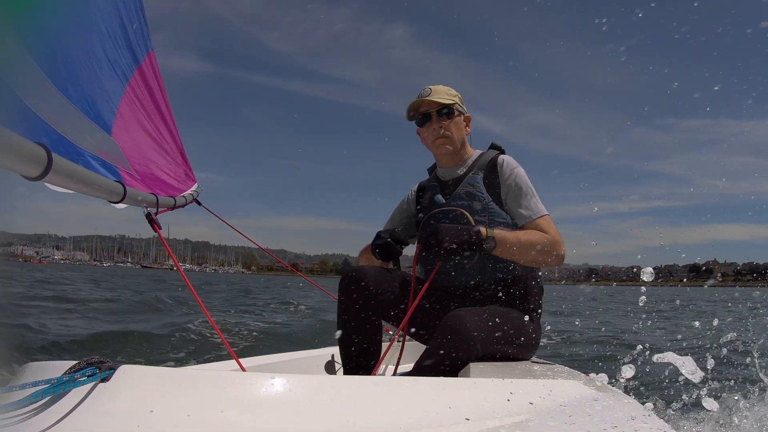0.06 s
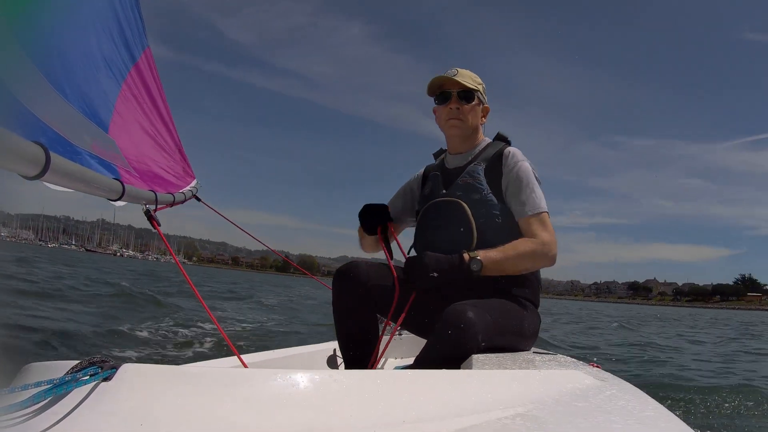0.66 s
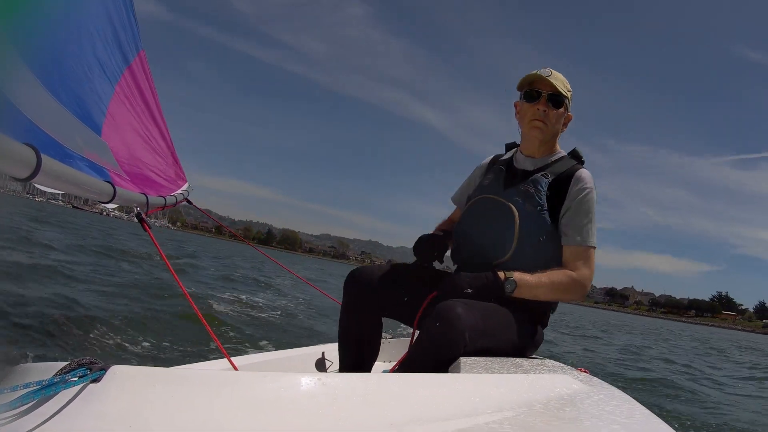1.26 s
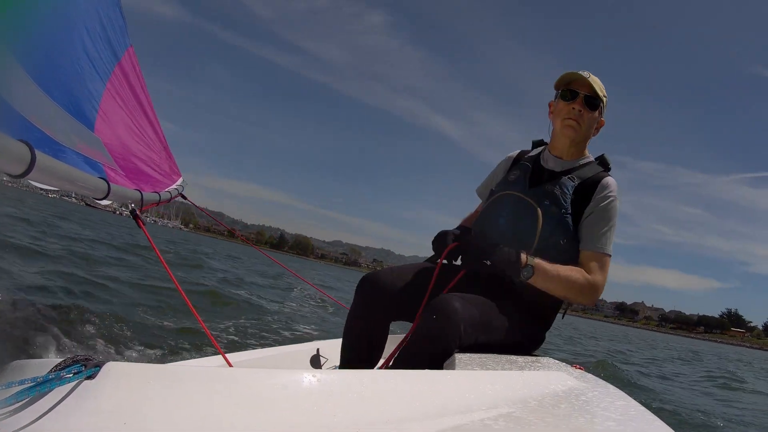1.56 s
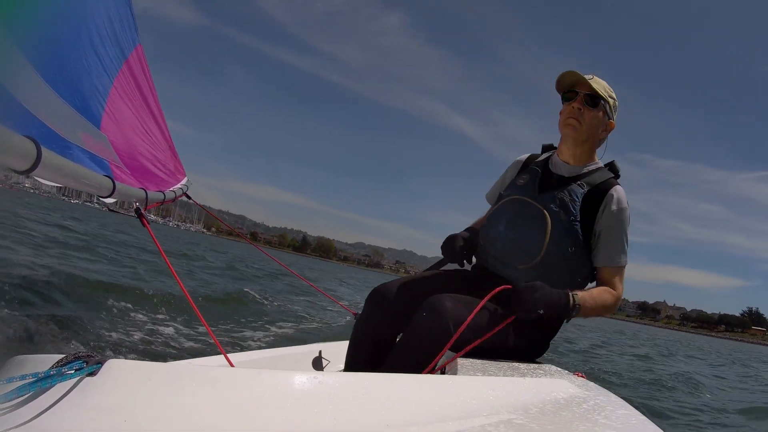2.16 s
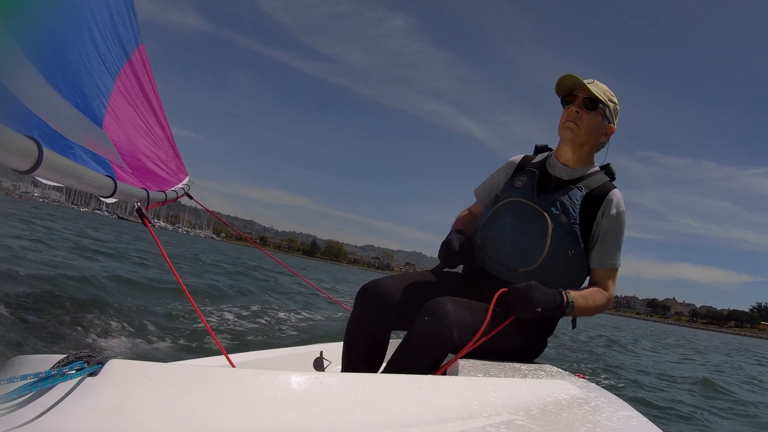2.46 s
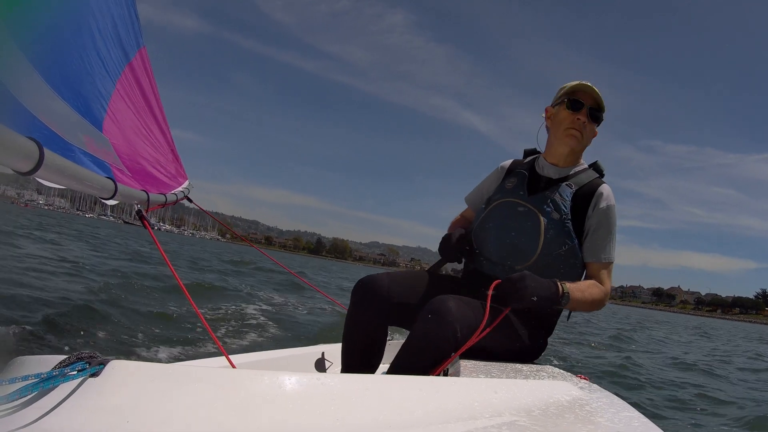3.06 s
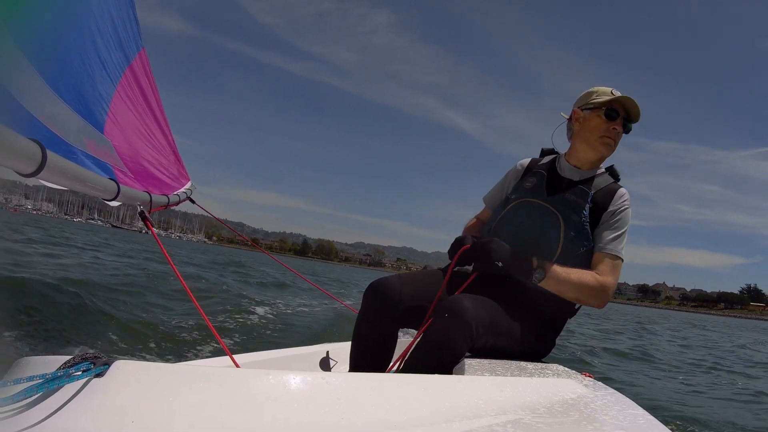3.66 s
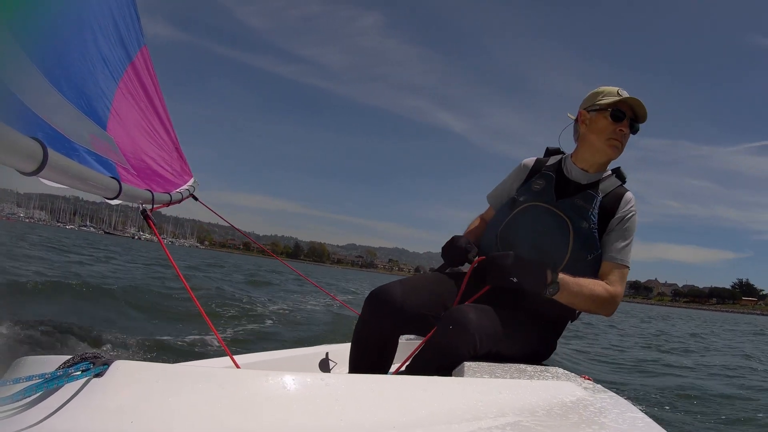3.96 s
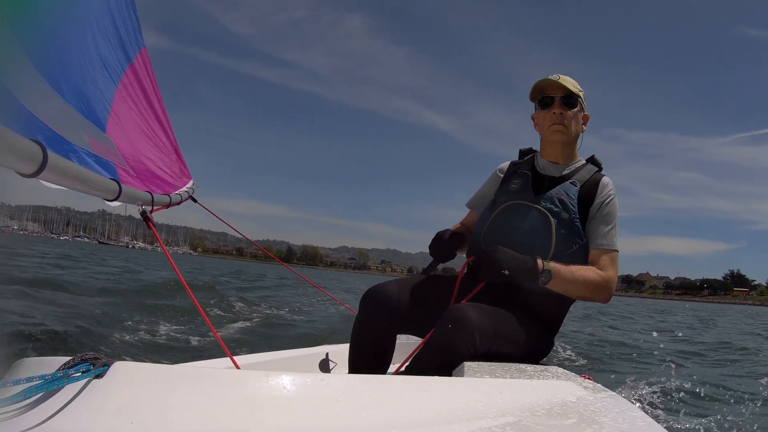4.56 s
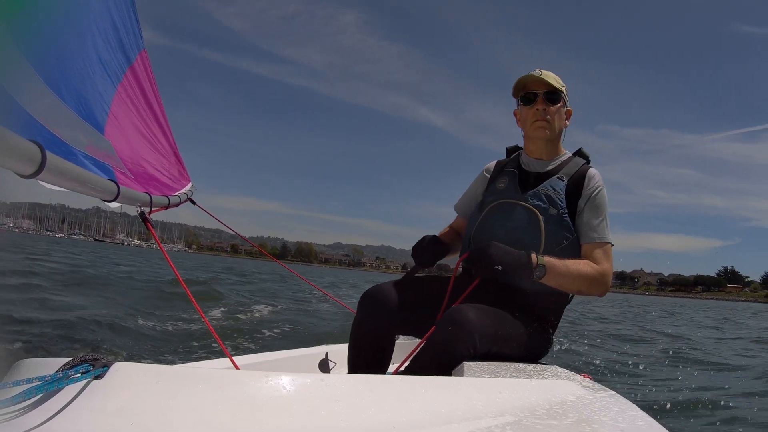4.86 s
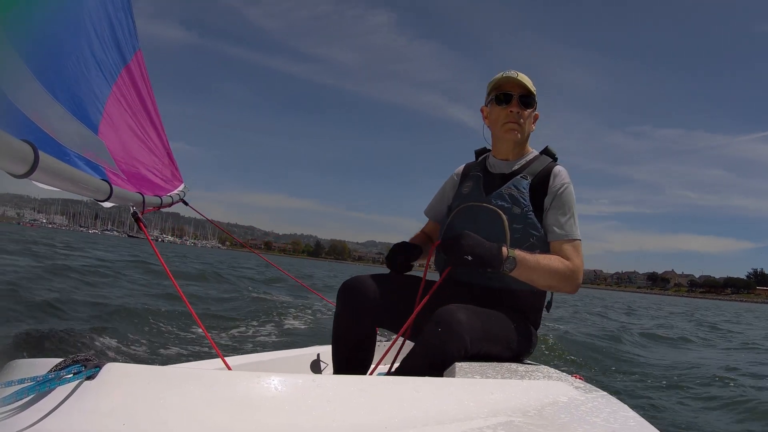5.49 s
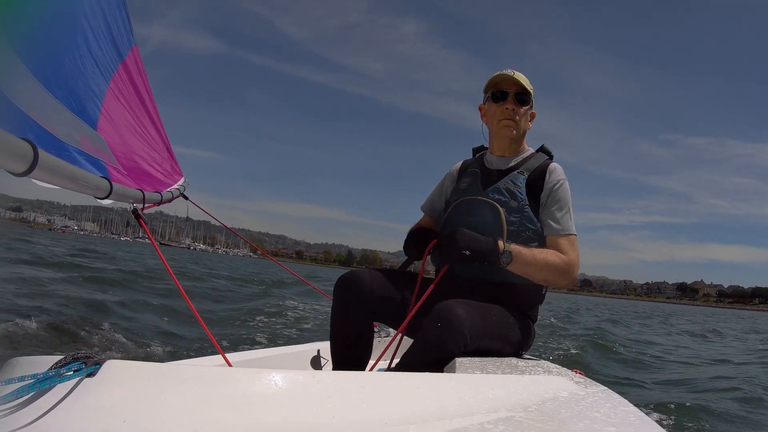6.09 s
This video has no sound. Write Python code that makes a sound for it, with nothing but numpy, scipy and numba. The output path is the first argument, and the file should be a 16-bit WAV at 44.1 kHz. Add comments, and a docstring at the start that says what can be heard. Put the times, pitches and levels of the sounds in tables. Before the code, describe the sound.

Muffled water gurgles and knocks along a sailing dinghy's hull in quick, booming surges, with rumbling wind and light ticks of spray.

```python
"""A sailing dinghy beats through short chop, heard from a camera in a waterproof case on deck.
Spray patters down at the start. Wave after wave then rushes and bubbles along the side and, with the wind,
buffets hull and case into a low boom; water slaps and knocks, drops tick on the case, a rope creaks.
The biggest waves come near 1.5, 3.2 and 6 s; after each, gain control briefly ducks the hiss.
Throughout, the case muffles the treble."""
import sys
import numpy as np
from scipy import signal
from scipy.fft import rfft, irfft
from scipy.io import wavfile
from scipy.ndimage import uniform_filter1d
from numba import njit

SR = 44100
rng = np.random.default_rng(int(sys.argv[2]) if len(sys.argv) > 2 else 0)


def store_pcm(level_fs):
    """Save levels as 16-bit WAV."""
    pcm = np.round(np.clip(level_fs, -1, 1) * 32767).astype(np.int16)
    wavfile.write(sys.argv[1], SR, np.atleast_2d(pcm).T)


N = 279151
TIME = np.arange(N) / SR


def undb(db):
    """Decibels to gain."""
    return 10 ** (np.asarray(db) / 20)


def unit_rms(x):
    """Scale to rms 1."""
    return x / np.sqrt(np.mean(x ** 2))


def unit_peak(x):
    """Scale to peak 1."""
    return x / np.abs(x).max()


def add(out, start_s, x):
    """Mix x into out from start_s."""
    i = int(np.clip(start_s * SR, 0, N - 1))
    out[i:i + len(x)] += x[:N - i]


def later(x, lag_s):
    """The same curve lag_s later."""
    return np.interp(TIME - lag_s, TIME, x)


def colour(x, points, size=4096):
    """Minimum-phase filter through (Hz, dB) points."""
    hz, db = np.transpose(points)
    grid_hz = np.maximum(np.arange(size // 2 + 1) * SR / size, 1)
    gain = undb(np.interp(np.log(grid_hz), np.log(hz), db))
    cepstrum = irfft(np.log(gain))
    cepstrum[1:size // 2] *= 2
    cepstrum[size // 2 + 1:] = 0
    impulse_response = irfft(np.exp(rfft(cepstrum)))
    return signal.fftconvolve(x, impulse_response)[:len(x)]


def band(x, hz, width_hz):
    """One resonance, gain 1 at its centre."""
    return signal.lfilter(*signal.iirpeak(hz, hz / width_hz, fs=SR), x)


def ring(x, modes):
    """A body's resonances in parallel."""
    return sum(undb(db) * band(x, hz, width_hz) for hz, width_hz, db in modes)


def wander(rate_hz):
    """Smooth random curve, rms 1, turning at about rate_hz."""
    step = int(SR / rate_hz)
    stairs = np.repeat(rng.standard_normal(N // step + 1), step)
    return unit_rms(uniform_filter1d(stairs, step)[:N])


def even_out(x, span_s):
    """Flatten swells slower than span_s; keep the quick flutter."""
    return x / np.sqrt(uniform_filter1d(x ** 2, int(span_s * SR)) + 1e-12)


# Hiss spectrum. Each row: frequency in Hz, gain in dB.
HISS_COLOUR = [(100, 2.5), (3000, 6), (5000, 0), (8000, -1.5), (12000, -2), (16000, -4)]


def electronics(whine_hz=9690, hop_hz=240, jitter_hz=90, hop_jitter_hz=130):
    """The camera hisses; its faint, flickering whine hops between a clear pitch and a rough, higher one."""
    hiss = unit_rms(colour(rng.standard_normal(N), HISS_COLOUR))
    hopped = wander(5) > .2
    pitch_hz = whine_hz + hop_hz * hopped + (jitter_hz + hop_jitter_hz * hopped) * wander(600)
    whine = np.sin(2 * np.pi * np.cumsum(pitch_hz) / SR)
    flicker = np.clip(1 + .5 * wander(24), 0, 1.2) * (0.99 + 0.4 * wander(250))
    return undb(-57.5) * hiss + undb(-64.5) * flicker * whine


# Rope running through its block. Each row: start in seconds, level in dB, length in seconds, pitch in Hz.
CREAKS = [(0.324, -58.5, 0.24, 3120), (1.22, -53, 0.021, 2370), (1.257, -67, 0.22, 2470),
          (2.82, -49, 0.047, 3700), (4.22, -49, 0.016, 3660), (4.744, -52, 0.0076, 3680),
          (5.055, -55, 0.013, 3660)]


def creaks(width_hz=260, overtone_ratio=1.173, overtone_db=-7):
    """The rope sticks and slips under load and makes its block sing."""
    out = np.zeros(N)
    slips = rng.standard_normal(N) * undb(1.3 * wander(360))
    for start_s, db, length_s, hz in CREAKS:
        size = int(length_s * SR)
        rub = slips[int(start_s * SR):][:size]
        tone, overtone = (band(band(rub, f, width_hz), f, width_hz) for f in (hz, hz * overtone_ratio))
        creak = (tone + undb(overtone_db) * overtone) * signal.windows.tukey(size, .6)
        add(out, start_s, undb(db) * unit_rms(creak))
    return out


# Falling spray. Each row: start in seconds, level in dB, length in seconds.
SHOWERS = [(0.0, -43.5, 0.14), (0.328, -55, 0.26), (3.118, -51, 0.099)]
# Patter spectrum. Each row: frequency in Hz, gain in dB.
SHOWER_COLOUR = [(800, -7), (2000, 22), (3000, 0), (4000, 2), (4900, -4), (6200, -5), (7300, -13.5),
                 (10000, -27), (15000, -31)]


def showers(spread_db=4.0):
    """Clouds of tiny droplets patter on deck and water."""
    envelope = np.zeros(N)
    for start_s, db, length_s in SHOWERS:
        add(envelope, start_s, undb(db) * signal.windows.tukey(int(length_s * SR), .4))
    patter = rng.standard_normal(N) * undb(spread_db * wander(540))
    return envelope * unit_rms(colour(patter, SHOWER_COLOUR))


# Case resonances. Each row: centre in Hz, width in Hz, gain in dB.
CASE_MODES = [(1690, 59, -1.5), (2080, 68, -4.5), (2570, 210, 1), (3062, 140, 3), (3476, 190, -0.5),
              (4080, 170, -2.5), (4440, 130, -14.5)]
# Fizz spectrum. Each row: frequency in Hz, gain in dB.
FIZZ_COLOUR = [(1000, 4), (2400, -2), (3500, -7), (4300, -17.5), (4700, -24.5), (9000, -26.5)]


def spray(rush, spray_to_rush_db=-31, lead_s=0.0081, foam_db=-59.5):
    """Foam fizzes and each wave throws fine spray just ahead of its crest, heard through the case."""
    fizz = rng.standard_normal(N) * undb(3.3 * wander(600))
    thrown = undb(spray_to_rush_db) * later(rush, -lead_s)
    foam = undb(foam_db + 4.2 * wander(6.8))
    return unit_rms(colour(ring(fizz, CASE_MODES), FIZZ_COLOUR)) * np.hypot(thrown, foam)


# Drops on the case. Each row: start in seconds, peak in dB, cutoff of the blow in Hz.
DROPS = [(0.3413, -8.5, 2570), (0.9764, -12.5, 2030), (1.471, -24, 2800), (1.501, -10.5, 2400),
         (1.8184, -10.5, 4400), (2.7366, -16, 3000), (2.739, -16, 3800), (2.748, -16.5, 3400),
         (2.863, -22.5, 2400), (2.9168, -18.5, 2500), (4.2006, -5.5, 4960), (4.6685, -9, 2500),
         (5.2396, -24.5, 3680), (5.3021, -17, 3700), (6.0745, -14, 4300)]
# Tick spectrum. Each row: frequency in Hz, gain in dB.
DROP_COLOUR = [(150, -6.5), (450, 11.5), (2000, 1), (4400, -2), (4650, -19.5), (7200, -4.5), (9000, -10.5),
               (14000, -17)]


def drops(splat_s=0.0046, splat_db=-31, thud_db=-15, size=2048):
    """A drop briefly rings the plastic case; fat drops push longer and sound duller."""
    out, t = np.zeros(N), np.arange(size) / SR
    for start_s, peak_db, cutoff_hz in DROPS:
        impulse = t == 0
        splat = undb(splat_db) * rng.standard_normal(size) * np.exp(-t / splat_s)
        blow = signal.lfilter(*signal.butter(3, cutoff_hz, fs=SR), impulse + splat)
        tick = colour(ring(blow, CASE_MODES) + undb(thud_db) * blow, DROP_COLOUR)
        add(out, start_s, undb(peak_db) * unit_peak(tick))
    return out


def bubble(t, hz, cycles, glide):
    """An air pocket rings down, rising in pitch as it nears the surface."""
    age = t * hz / cycles
    return np.exp(-age) * np.sin(2 * np.pi * hz * t * (1 + glide * np.tanh(age / 2)))


def bubbles(count, low_hz, high_hz, spread_db, cycles, glide, size=1500):
    """A cloud of bubbles, many faint and a few strong."""
    out, t = np.zeros(N), np.arange(size) / SR
    for when, pitch, rank, life in rng.random((count, 4)):
        hz = low_hz * (high_hz / low_hz) ** pitch
        db = -spread_db * np.log(1 - rank * .99)
        add(out, when * N / SR, undb(db) * bubble(t, hz, cycles * (.5 + life), glide))
    return unit_rms(out)


# Resonances of the thin hull panels. Each row: centre in Hz, width in Hz, gain in dB.
PANEL_MODES = [(392, 24, -1.5), (580, 9.4, 1.5), (648, 14, 7.5), (1079, 7.4, -9.5), (1483, 36, 3),
               (1680, 80, 5)]
# Rushing water spectrum. Each row: frequency in Hz, gain in dB.
WATER_COLOUR = [(150, -20), (280, 4.5), (380, -5.5), (620, -2.5), (760, -2), (1100, 5.5), (1350, 2.5),
                (1550, -0.5), (1720, -6), (1900, -8.5), (2300, -16), (3500, -26), (5000, -66)]


def wash(rush, calm_db=-43, split_hz=900, lag_s=0.0011):
    """Bubbles gurgle and drum on the panels, swelling and fading with each wave."""
    gurgle = bubbles(count=11000, low_hz=329.2, high_hz=2081, spread_db=4.0, cycles=7.3, glide=0.057)
    churn = rng.standard_normal(N) * undb(3.24 * wander(90))
    water = colour(gurgle + undb(-1.5) * churn, WATER_COLOUR)
    water = even_out(water + undb(-3.5) * ring(water, PANEL_MODES), span_s=0.046)
    lows = signal.sosfiltfilt(signal.butter(2, split_hz, fs=SR, output="sos"), water)
    highs = water - lows
    flow = undb(-0.94) * np.hypot(rush, undb(calm_db))
    return lows * later(flow, lag_s) + highs * later(flow, -lag_s)


# Water slaps and knocks; the first is a drop's low knock on the case.
# Each row: start in seconds, peak in dB, ring pitch in Hz, splash relative to the ring in dB.
SLAPS = [(0.34, -14, 443, 14), (0.632, -9, 1317, -3), (0.671, -5.5, 1090, -15.5), (0.793, -22, 2570, -4),
         (0.798, -3, 1053, -14.5), (1.465, -5, 1560, 6), (1.63, -9.5, 1020, -10), (1.642, -12, 778, -12.5),
         (2.27, -17.5, 1250, 0), (2.67, -14, 1194, -7), (2.729, 0, 1084, -1), (2.978, -23, 298, -9),
         (3.169, -4, 611, -1.5), (3.197, 0.5, 685, 7.5), (3.443, -17, 944, -10), (3.659, -15.5, 1228, -2.5),
         (4.484, -16.5, 1240, -7), (4.531, -6, 1086, 3.5), (4.667, -15, 1905, 2), (4.889, -13.5, 380, 3.5),
         (4.934, -12.5, 1256, 0), (5.279, -16, 1224, -7), (5.574, -23, 1297, 1), (5.763, -11, 342, 2),
         (5.85, -17, 963, -3), (5.928, -21, 666, 17), (6.313, -6.5, 1340, 6)]
# Splash spectrum. Each row: frequency in Hz, gain in dB.
SPLASH_COLOUR = [(150, -26), (400, 5.5), (1200, 4), (1700, -2.5), (2100, -17.5), (3500, -25), (4300, -43.5),
                 (5000, -80.5)]


def slaps(splash_s=0.012, rise_s=0.00088, panel_db=-2, size=4096):
    """Water slaps and knocks: a splash, a ringing air pocket and drumming panels."""
    out, t = np.zeros(N), np.arange(size) / SR
    for start_s, peak_db, pocket_hz, splash_db in SLAPS:
        splash = colour(rng.standard_normal(size) * np.exp(-t / splash_s), SPLASH_COLOUR)
        splash = unit_peak(splash + undb(-1.5) * band(splash, pocket_hz, pocket_hz / 3))
        pocket = bubble(t, pocket_hz, cycles=6.2, glide=0.032)
        slap = (pocket + undb(splash_db) * splash) * (1 - np.exp(-t / rise_s))
        panels = undb(panel_db) * ring(slap, PANEL_MODES)
        add(out, start_s, undb(peak_db) * unit_peak(slap + panels))
    return out


# Waves meeting the hull. Each row: crest time in seconds, relative rush in dB, build-up in seconds,
# drain in seconds, relative boom in dB.
WAVES = [(0.005, -24.5, 0.089, 0.072, -18.5), (0.114, -34.5, 0.02, 0.16, -13),
         (0.246, -30.5, 0.015, .02, -17), (0.334, -30.5, 0.038, 0.083, -16), (0.523, -31, 0.14, 0.027, -24),
         (0.652, -20, 0.087, 0.097, -9), (0.835, -26, 0.065, 0.056, -10),
         (0.952, -30.5, 0.015, 0.063, -14.5), (1.043, -47, 0.1, 0.04, -16.5),
         (1.25, -37, 0.027, 0.047, -39), (1.33, -27, 0.021, 0.044, -20.5), (1.475, -16.5, 0.064, 0.097, -3),
         (1.608, -24, 0.15, 0.1, -24), (1.811, -29, .06, 0.12, -14), (2.056, -24.5, 0.041, 0.048, -12.5),
         (2.189, -28, 0.03, 0.077, -13.5), (2.308, -22, .045, 0.047, -11.5),
         (2.447, -28.5, 0.063, 0.061, -17), (2.737, -18, 0.067, 0.06, -5), (2.946, -28, 0.064, 0.08, -15),
         (3.224, -14.5, 0.036, 0.064, -2), (3.432, -27, 0.076, 0.063, -16.5),
         (3.673, -20, 0.021, 0.11, -5.5), (3.934, -20.5, 0.021, 0.065, -8), (4.115, -36, .15, 0.056, -14),
         (4.283, -25.5, 0.05, 0.085, -9.5), (4.495, -21.5, 0.029, 0.085, -6),
         (4.807, -26.5, 0.018, 0.049, -23.5), (4.939, -25, 0.075, 0.077, -9),
         (5.049, -26, 0.044, 0.063, -13.5), (5.232, -30.5, 0.017, 0.023, -17), (5.3, -24, .025, .065, -9),
         (5.392, -28.5, 0.014, .1, -10.5), (5.516, -27.5, 0.1, 0.013, -18.5),
         (5.769, -25.5, 0.025, 0.062, -6), (6.038, -17, 0.05, 0.073, -3), (6.231, -27, .069, 0.26, -15.5)]


def swells(roundness=1.155):
    """Waves build and drain: envelopes of rushing water and of the push on the hull."""
    rush_power, push_power = np.zeros(N), np.zeros(N)
    for crest_s, rush_db, build_s, drain_s, boom_db in WAVES:
        age_s = TIME - crest_s
        from_crest = np.maximum(-age_s / build_s, age_s / drain_s)
        power = undb(-0.5) * np.exp(-2 * from_crest ** roundness)  # roundness 1: pointed, 2: bell
        rush_power += undb(rush_db) ** 2 * power
        push_power += undb(boom_db) ** 2 * power
    return np.sqrt(rush_power), np.sqrt(push_power)


def thuds(hz=162.7, rise_s=0.018, sag=0.19, sag_s=0.026, scatter=0.032, size=6000):
    """Each crest thuds on the hull, big ones far more; the pitch sags as more water clings to it."""
    out, t = np.zeros(N), np.arange(size) / SR
    envelope = (t / rise_s) ** 2 * np.exp(2 - 2 * t / rise_s)
    bend = 1 + sag * (2 * np.exp(-t / sag_s) - 1)
    for crest_s, *_, boom_db in WAVES:
        pitch_hz = hz * (1 + scatter * rng.standard_normal()) * bend
        db = -7.5 + 1.3 * (boom_db + 10)  # grows 1.3 dB per dB of boom
        add(out, crest_s, undb(db) * envelope * np.sin(2 * np.pi * np.cumsum(pitch_hz) / SR))
    return out


# Resonances of hull and camera mount. Each row: centre in Hz, width in Hz, gain in dB.
HULL_MODES = [(108.14, 8, -0.5), (126.6, 18, 0.5), (147, 9.3, -1.5), (163.4, 28, 1.5), (203.7, 12, 3.5),
              (223.3, 16, -17)]
# Spectra of hull boom and wind rumble. Each row: frequency in Hz, gain in dB.
BOOM_COLOUR = [(40, -22.5), (76, -10.5), (100, 2.5), (228, 0), (255, -20), (400, -22.5), (1000, -43)]
WIND_COLOUR = [(15, -9), (35, 4), (55, 0), (85, 3), (200, 8), (280, -4), (400, -19.5), (700, -36.5),
               (1500, -66.5)]


def buffeting(push, lag_s=0.021, wind_db=-33):
    """Turbulent wind and waves ring hull and mount; wind also rumbles directly on the case."""
    hull = ring(rng.standard_normal(N), HULL_MODES)
    boom = even_out(colour(hull, BOOM_COLOUR), span_s=.025)
    rumble = unit_rms(colour(rng.standard_normal(N), WIND_COLOUR))
    force = np.hypot(later(push, lag_s), undb(wind_db))
    return force * (undb(-0.53) * boom + undb(-21.0) * rumble) + undb(-47) * rumble


def scene():
    """Mono mix; the same waves drive boom, wash and spray."""
    rush, push = swells()
    water = wash(rush) + spray(rush) + showers() + slaps() + drops()
    return (buffeting(push) + thuds() + water + creaks() + electronics())[None]


@njit
def follow(x, attack, release):
    """Envelope follower; attack and release are fractions per sample."""
    out, level = np.empty(len(x)), 0.
    for i in range(len(x)):
        gap = abs(x[i]) - level
        level += gap * (attack if gap > 0 else release)
        out[i] = level
    return out


def record(dry, attack_s=0.0072, release_s=0.096, knee_db=-14.5, slope=0.71, cutoff_hz=15800):
    """Gain control ducks big waves and recovers slowly; a steep low-pass cuts the top."""
    envelope = follow(dry[0], 1 / (attack_s * SR), 1 / (release_s * SR))
    gain = (1 + (envelope / undb(knee_db)) ** 2) ** (-slope / 2)
    lowpass = signal.ellip(10, .1, 80, cutoff_hz, fs=SR, output="sos")
    return signal.sosfilt(lowpass, dry * gain)


dry = scene()
out = record(dry)
store_pcm(out)
```